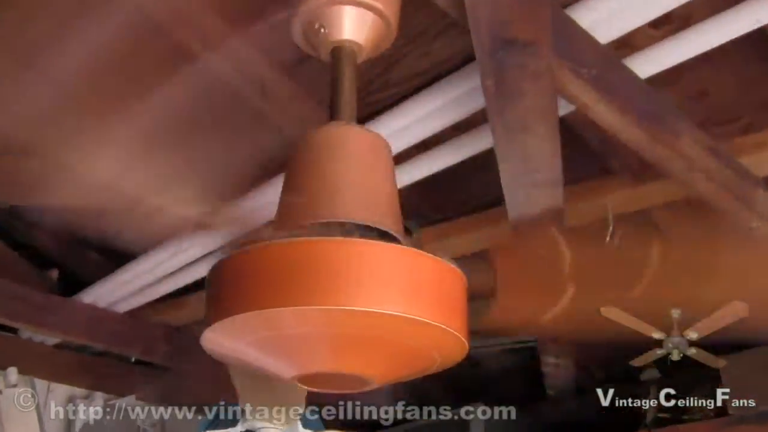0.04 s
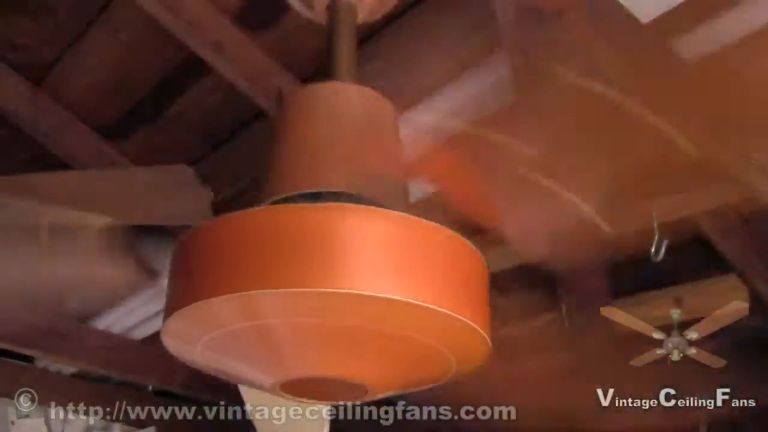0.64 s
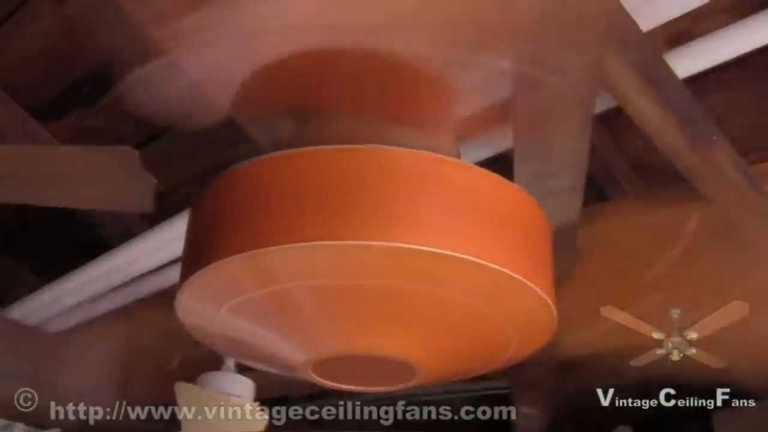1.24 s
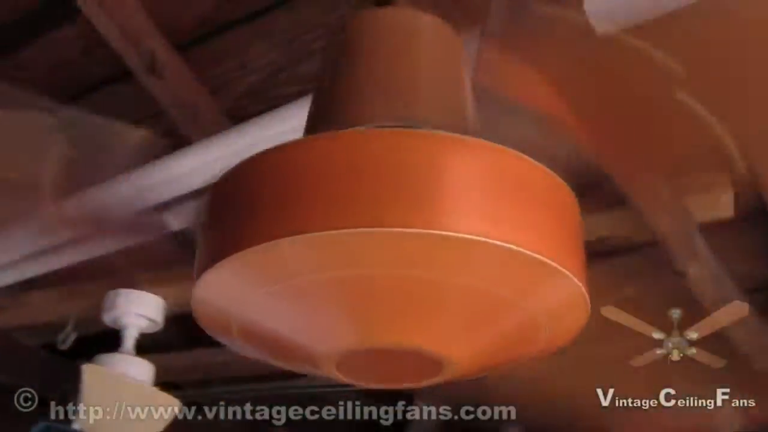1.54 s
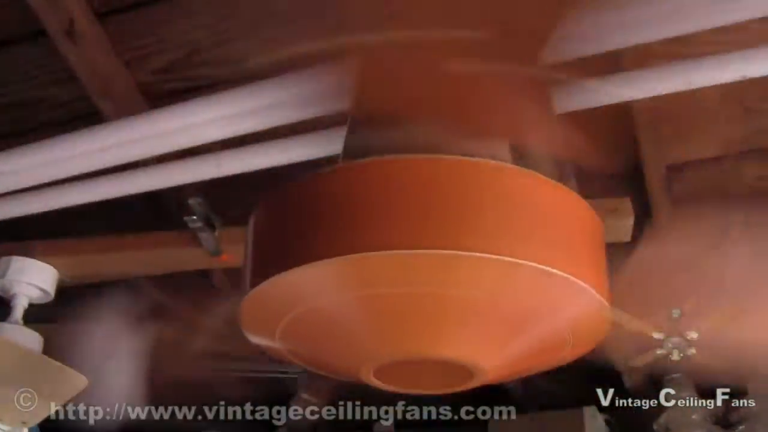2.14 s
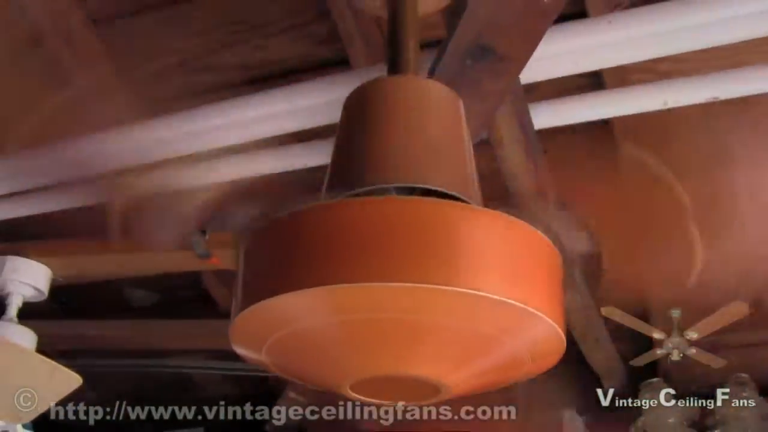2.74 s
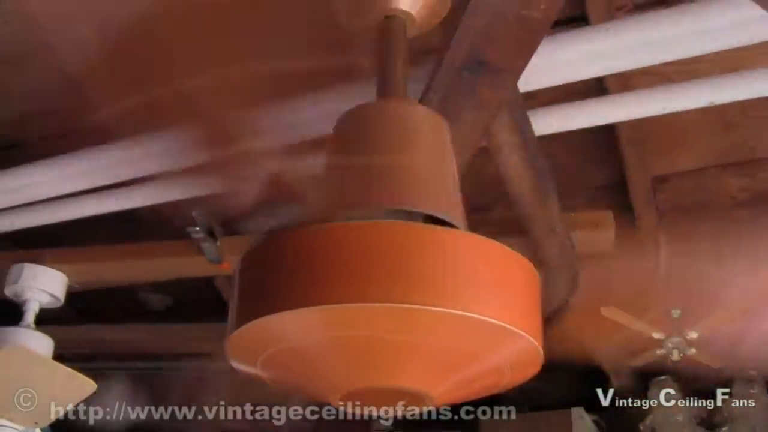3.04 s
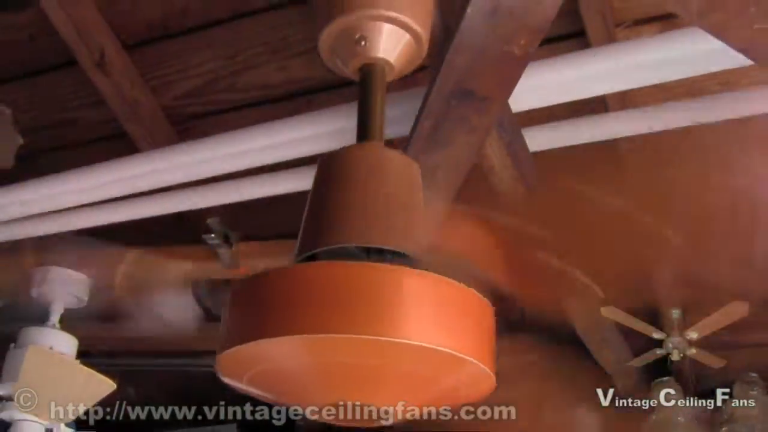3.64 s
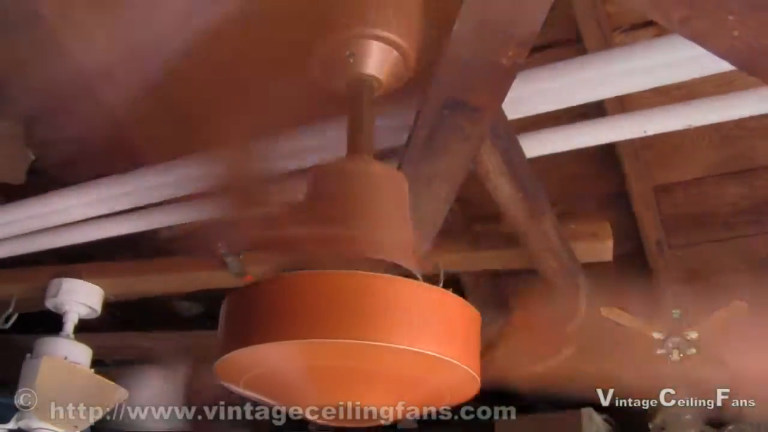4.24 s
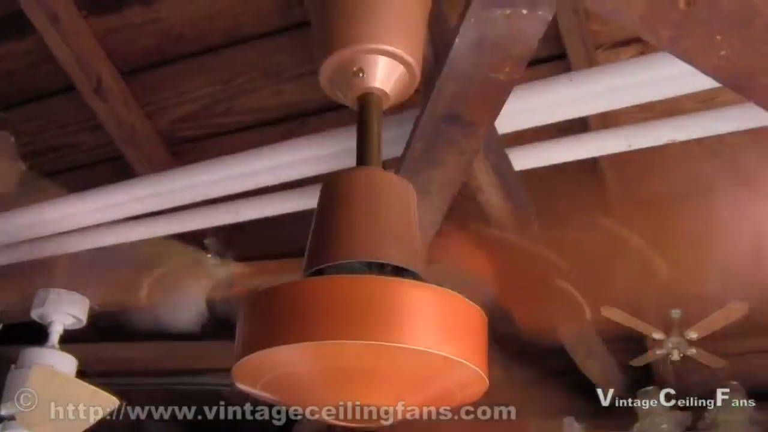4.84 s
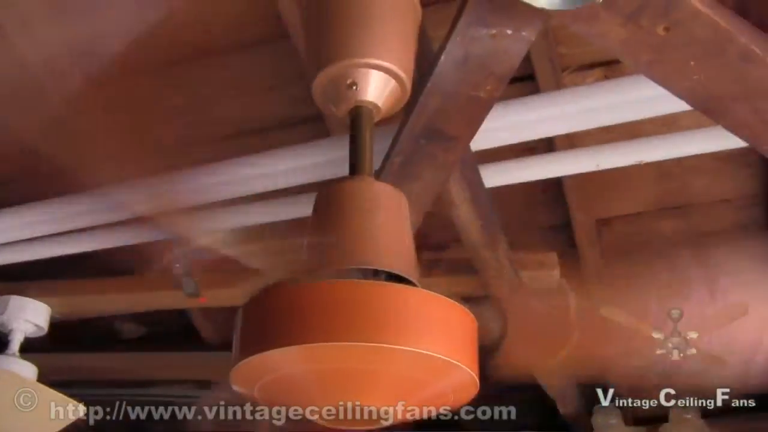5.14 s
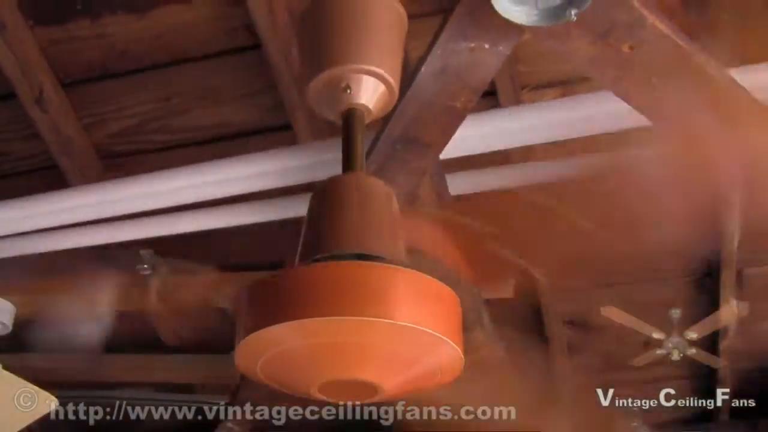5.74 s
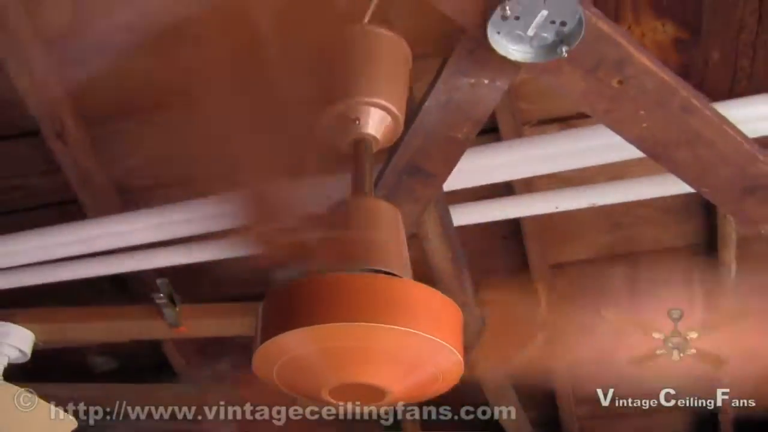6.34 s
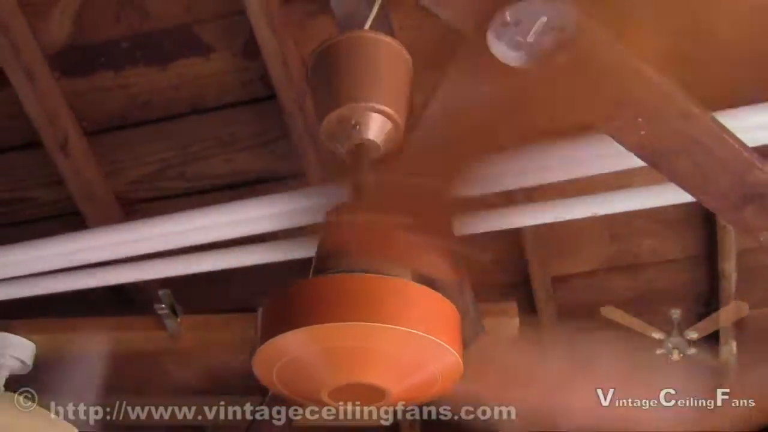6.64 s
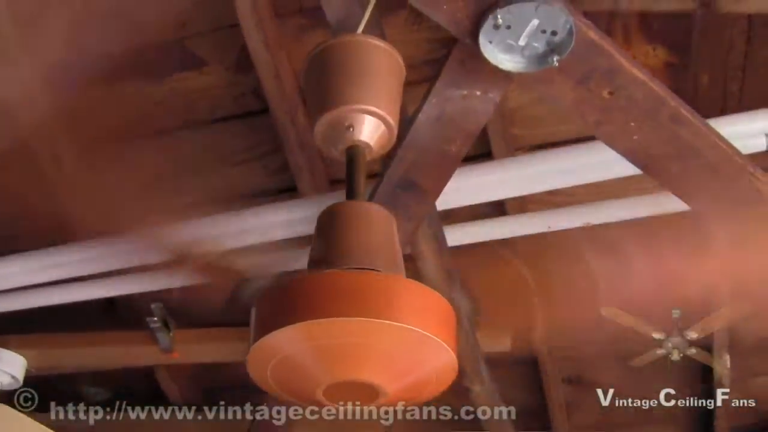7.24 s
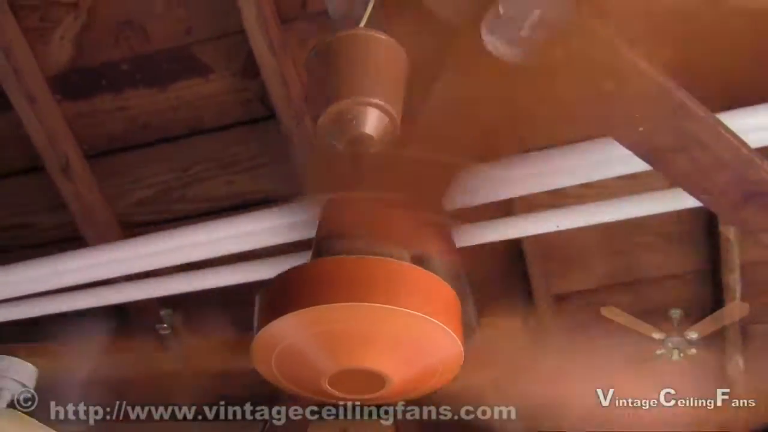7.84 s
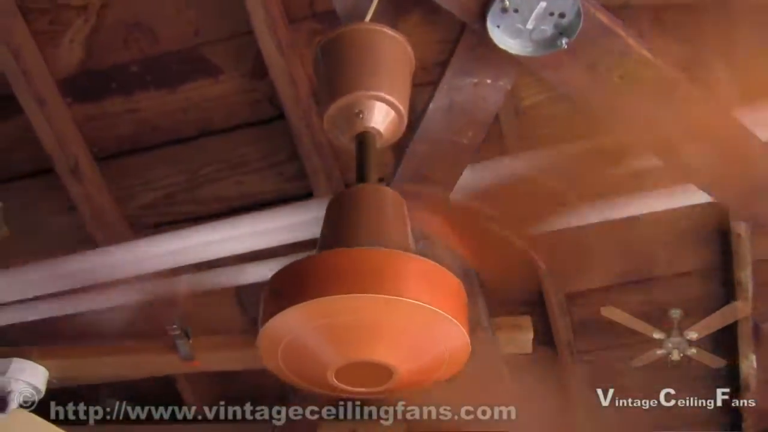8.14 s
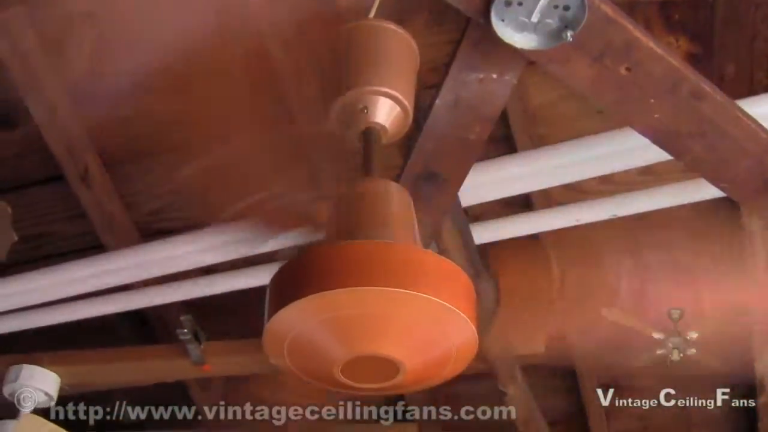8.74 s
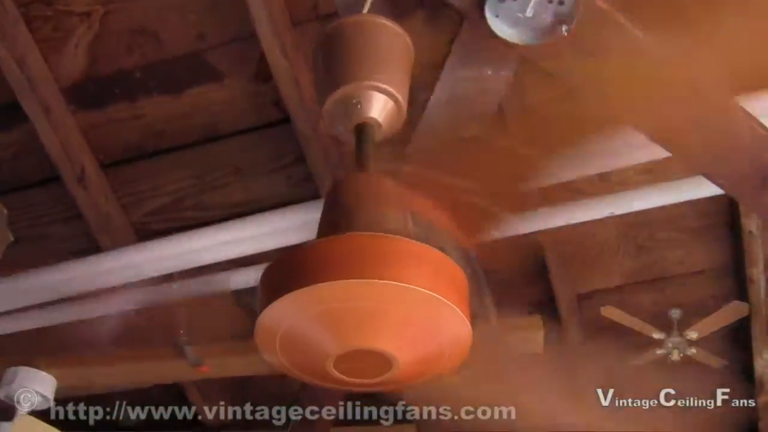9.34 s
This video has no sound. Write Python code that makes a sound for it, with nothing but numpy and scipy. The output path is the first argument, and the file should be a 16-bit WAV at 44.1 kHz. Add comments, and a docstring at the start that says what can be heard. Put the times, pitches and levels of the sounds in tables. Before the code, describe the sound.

A ceiling fan with metal blades spins fast indoors, close to a hand-held stereo microphone. Throughout, the blades swish about sixteen times a second over a steady rush of air, with a soft hollow tone and a faint motor hum. From about 0.3 seconds the downdraught strikes the microphone in loud, ragged, crackling puffs, with deep rumbles and dull thumps shifting between left and right. This buffeting drops away at about 3.6 seconds, returning in weaker gusts between 4 and 4.5 seconds. The quieter, pulsing rush then carries on, with a short snap of air at 4.75 seconds and a softer one near 5.7. One more brief gust thumps the microphone at 7.5 seconds. A few light snaps follow around 8 seconds as a faint, higher airy tone joins in, and the fan keeps swishing until the end at about 9.5 seconds.

```python
"""Under a fast ceiling fan

Metal blades spin under a timber roof, close to a hand-held stereo microphone. Each blade swishes over a
steady rush of air and a faint motor hum. For the first seconds the downdraught hits the two microphone
ports in ragged, crackling puffs, one a blade, then only in stray gusts. A limiter ducks the rush under
the strongest of them."""
import sys
import numpy as np
from scipy import signal
from scipy.fft import rfft, irfft, next_fast_len
from scipy.io import wavfile
from scipy.ndimage import uniform_filter1d, minimum_filter1d, map_coordinates

SR = 44100
rng = np.random.default_rng(int(sys.argv[2]) if len(sys.argv) > 2 else 0)


def unload_audio(sound):
    """Save the sound as a 16-bit wav file, at the path given as the first command line argument."""
    columns = np.transpose(np.atleast_2d(sound))
    # keep every value between -1 and 1, then stretch to whole-number steps
    steps = np.round(np.clip(columns, -1, 1) * 32767)
    wavfile.write(sys.argv[1], SR, steps.astype(np.int16))


N = 418508
TIME = np.arange(N) / SR
BLADE_HZ = 15.8  # blade passes a second


def amp(db):
    """Decibels to gain."""
    return 10 ** (np.asarray(db) / 20)


def unit(x):
    """Scales to rms 1."""
    return x / np.sqrt(np.mean(x ** 2) + 1e-20)


def curve(rows, column=1):
    """One column of a time table at every sample."""
    rows = np.asarray(rows)
    return np.interp(TIME, rows[:, 0], rows[:, column])


def colour(x, *spectra):
    """Filters x by the product of spectra given as f/Hz, level/dB."""
    size = next_fast_len(N)
    log_hz = np.log(np.fft.rfftfreq(size, 1 / SR) + 1)
    db = sum(np.interp(log_hz, np.log(rows[:, 0] + 1), rows[:, 1]) for rows in map(np.asarray, spectra))
    return irfft(rfft(x, size) * amp(db), size)[:N]


def noise(*spectra):
    """Fresh noise of the given colour."""
    return colour(rng.standard_normal(N), *spectra)


def even_noise(spectrum, even_s=0.0087):
    """Coloured noise whose strength holds from one instant to the next."""
    x = noise(spectrum)
    power = uniform_filter1d(x ** 2, size=int(even_s * SR))
    return x / np.sqrt(abs(power) + 1e-20)


def wander(rate):
    """Smooth random drift of rms 1 that takes a new value rate times a second."""
    return unit(map_coordinates(rng.standard_normal(4096), [TIME * rate], order=2, mode="wrap"))


def split(x, hz):
    """The parts of x below and above hz."""
    low = signal.sosfiltfilt(signal.butter(2, hz, fs=SR, output="sos"), x)
    return low, x - low


# How late the blades come by as the microphone moves around the fan: t/s, lag/passes
BLADE_LAG = [(0.0, 0.33), (0.3, 0.42), (0.6, 0.29), (1.2, 0.71), (1.8, 1.07), (2.2, 0.85), (2.85, 0.96),
             (3.1, 0.83), (3.5, 0.83), (4.5, 0.88), (6.0, 1.084), (8.2, 1.093), (9.45, 0.97)]
def blade_count():
    """Running count of blade passes at the microphone, a whole number at each crest."""
    return BLADE_HZ * TIME - curve(BLADE_LAG)


def blade_pass(lead=0., peakiness=0.):
    """Swings once a blade, lead passes early; peakiness sharpens the crest."""
    angle = 2 * np.pi * (blade_count() + lead)
    return np.cos(angle) + peakiness * np.cos(2 * angle)


# The motor overhead, faint behind the air: f/Hz, level/dB
MOTOR_TONES = [(125, -57.5), (172.3, -52)]
def motor_hum(waver_db=3.0):
    """The motor's tones hold their pitch and waver in level."""
    hum = np.zeros(N)
    for hz, db in MOTOR_TONES:
        level = np.sqrt(2) * amp(db + waver_db * wander(2.6))
        hum += level * np.sin(2 * np.pi * (hz * TIME + rng.random()))
    return hum


def tick(at_s=3.083, level_db=-52, band_hz=(4000, 7200), ring_s=0.006):
    """One faint, bright tick."""
    t = TIME - at_s
    band = signal.butter(3, band_hz, "band", fs=SR, output="sos")
    ring = unit(signal.sosfilt(band, rng.standard_normal(N)))
    return amp(level_db) * ring * (t > 0) * np.exp(-np.clip(t, 0, 1) / ring_s)


# Broad tone of the blades' vortices, from where the microphone is held: t/s, f/Hz, level/dB
LOW_WHOO = [(0, 561.8, -43), (3.6, 519.7, -42.5), (4.5, 544, -41.5), (4.8, 626, -38.5), (5.05, 561.8, -51),
            (7.1, 431, -48.5), (7.7, 437.7, -46), (8.2, 443.6, -55), (9.45, 443.7, -50)]
# A higher one, heard once the microphone has drawn back: t/s, f/Hz, level/dB
HIGH_WHOO = [(0, 1200, -68), (6.7, 1200, -63.5), (7.3, 1212, -55.5), (7.9, 1220, -48), (8.4, 1187, -50),
             (9.45, 1207, -52)]
def vortex_tone(path, width_hz, glide, depth_db, uneven_db=4.0):
    """Shed vortices make a hollow whoo that swells with each blade and falls in pitch as it goes by."""
    hz = curve(path) * (1 + glide * blade_pass(lead=0.28))
    phase = 2 * np.pi * np.cumsum(hz) / SR
    tone = unit(wander(width_hz) * np.cos(phase) + wander(width_hz) * np.sin(phase))
    swell_db = depth_db * blade_pass(peakiness=0.36) + uneven_db * wander(BLADE_HZ)
    return tone * amp(curve(path, column=2) + swell_db)


# Air noise of the blades in the room: f/Hz, level/dB
RUSH_SPECTRUM = [(20, -26.5), (42, -21.5), (70, -10), (125, -2.5), (210, -6), (350, -6.5), (720, -7),
                 (1400, -14.5), (2550, -16.5), (3100, -26), (5700, -40.5), (9300, -48.5), (12000, -59.5),
                 (15500, -71.5)]
# Its stereo width at the microphone: f/Hz, side minus mid/dB
RUSH_SIDE = [(60, -25), (110, -17.5), (200, -17), (380, -15), (700, -18.5), (1290, -22), (2380, -16),
             (4400, -12), (8120, -8), (15000, 2.5)]
# Rings of the blades, housing and roof space: f/Hz, width/Hz, level/dB
RESONANCES = [(177, 11, 5), (272, 58, 2), (334.6, 24, 7), (847, 22, 5.5), (1136, 18, 4), (1680, 210, -2.5)]
def air_rush(level_db=-34.0):
    """Mid and side of the steady air noise, coloured by the fan and the space under the roof."""
    hz = np.geomspace(20, 4000, 2000)
    rings_db = sum(db / (1 + (2 * (hz - centre) / width) ** 2) for centre, width, db in RESONANCES)
    rings = np.transpose([hz, rings_db])
    mid, side = noise(RUSH_SPECTRUM, rings), noise(RUSH_SPECTRUM, rings, RUSH_SIDE)
    return amp(level_db) * np.array([mid, side]) / np.std(mid)


# How strongly the blades' whoosh and hiss come through and pulse; the hiss sinks under the wind:
# t/s, wake level/dB, hiss level/dB, whoosh depth/dB, hiss depth/dB
SWISH_LEVELS = [(0, -0.5, 3, 2, 1.5), (0.33, 3.5, 2, 2.5, 2.5), (0.45, 0.5, -0.5, 4.5, 0),
                (1.15, -2.5, 1, 4, 2.5), (1.6, 6.5, 1, 2.5, -2), (2.3, -0.5, -2.5, -3, 0.5),
                (3.5, 4.5, -1.5, 3.5, 3), (3.65, 1.5, 3.5, 2.5, 2.5), (4.8, 3, 3, 3, 2),
                (4.95, 2.2, 3, 2, 2.5), (5.4, 1.6, 2.1, 1.5, 3), (7.2, -0.8, 0.5, 1.5, 1.2),
                (7.8, 0, 1, 3, 1.5), (8.6, 0.1, 1.5, 1, 1.5), (9.45, 0, 2, 2, 1)]
def blade_swish(thrum_depth=2.8, fizz_depth=0.67, flutter_db=1.39, uneven=0.16):
    """Mid and side: each wake thrums and whooshes, the edges hiss just before, under a steadier fizz."""
    wake, edges = split(air_rush(), hz=1550)
    thrum, whoosh = split(wake, hz=330)
    hiss, fizz = split(edges, hz=3800)
    # no two passes are quite alike, and the wake flutters most at the crest of each
    swing = blade_pass(lead=0.01, peakiness=0.19) * (1 + uneven * wander(BLADE_HZ))
    whoosh_db = curve(SWISH_LEVELS, column=3) * swing
    wake_db = curve(SWISH_LEVELS) + flutter_db * wander(220) * (1 + swing / 2)
    edge_swing = blade_pass(lead=0.02, peakiness=0.71) * (1 + uneven * wander(BLADE_HZ))
    hiss_db = curve(SWISH_LEVELS, column=4) * edge_swing
    wake = thrum * amp(thrum_depth * whoosh_db) + whoosh * amp(whoosh_db)
    edges = hiss * amp(hiss_db) + fizz * amp(fizz_depth * hiss_db)
    return wake * amp(wake_db) + edges * amp(curve(SWISH_LEVELS, column=2))


# The snaps that reach the microphone most clearly: t/s, level/dB
CLEAR_SNAPS = [(4.750, -11), (5.745, -19), (7.793, -16.5), (7.857, -21), (7.914, -22), (7.983, -16),
               (8.108, -14)]
def blade_snaps(level_db=-31, spread_db=2.0, scatter_s=0.004, spike_s=0.00027, suck_s=0.0011):
    """Each blade cuts the eddy shed by the one before: a pressure spike between two shallow dips."""
    crests = np.flatnonzero(np.diff(np.floor(blade_count())) > 0)
    late, size = rng.standard_normal((len(crests), 2)).T
    landings = np.clip(crests + (scatter_s * SR * late).astype(int), 0, N - 1)
    hits = np.zeros(N)
    hits[landings] = amp(level_db + curve(SWISH_LEVELS)[crests] + spread_db * np.clip(size, -2, 2))
    for at_s, db in CLEAR_SNAPS:
        hits[round(at_s * SR)] += amp(db)
    t = np.arange(-400, 401) / SR
    pulse = np.exp(-(t / spike_s) ** 2 / 2) - spike_s / suck_s * np.exp(-(t / suck_s) ** 2 / 2)
    return signal.oaconvolve(hits, pulse / pulse.max(), "same")


# The downdraught as the microphone moves into it and out again: t/s, level/dB
DOWNDRAUGHT = [(0.0, -50), (0.33, -28), (0.45, -18), (0.66, -17), (0.95, -14), (1.03, -21.5), (1.15, -15),
               (1.7, -17.5), (2.05, -14), (2.7, -19.5), (3.05, -13.5), (3.53, -15.5), (3.57, -29.5),
               (4.4, -51), (5.0, -54), (9.45, -84)]
# Gusts that reach the microphone from the edge of the draught: t/s, level/dB
STRAY_GUSTS = [(0.2, -24), (0.28, -23), (3.62, -33), (3.71, -28), (3.939, -34), (4.109, -20), (4.3, -20.5),
               (4.44, -23), (7.3, -47), (7.47, -32), (8.299, -36), (8.35, -39), (8.42, -38), (8.791, -40),
               (9.06, -46)]
def air_strength_db(rise_db_per_s=385, fall_db_per_s=194):
    """Air on the ports: the downdraught plus gusts that rise fast and fall more slowly."""
    gusts = [db - np.maximum(rise_db_per_s * (at_s - TIME), fall_db_per_s * (TIME - at_s))
             for at_s, db in STRAY_GUSTS]
    return 10 * np.log10(sum(amp(db) ** 2 for db in [curve(DOWNDRAUGHT), *gusts]))


# Slow air curling over both ports alike: f/Hz, level/dB
RUMBLE_SPECTRUM = [(15, -31.5), (30, -5), (55, -3), (100, 0.5), (155, -4.5), (230, -15), (450, -38),
                   (1500, -76), (6000, -125)]
def rumble(air_db, level_db=-26, knee_db=-36, growth=0.75, puff_db=1.3, lumpy_db=3.0):
    """Large slow eddies appear with the faintest draught and level off in strong air."""
    speed = amp(air_db - knee_db)
    level = amp(level_db + puff_db * blade_pass(lead=-0.033) + lumpy_db * wander(25))
    return level * (speed / (1 + speed)) ** growth * unit(noise(RUMBLE_SPECTRUM))


# Large eddies that press on both ports at once: t/s, level/dB, f/Hz
LARGE_EDDIES = [(0.397, -1, 80), (0.449, -3, 170), (0.592, 5.5, 125), (0.911, -10, 198), (1.105, -3, 253),
                (1.382, -5, 240), (1.572, -6, 184), (1.958, -1, 170), (2.012, -6, 180), (2.2, -12, 198),
                (2.455, -6.5, 189), (2.518, -8.5, 181), (2.739, -5.5, 170), (2.965, -7, 250),
                (3.542, -1.5, 32.2), (3.729, -10.5, 76), (3.787, -11, 65), (4.106, -8.5, 101),
                (4.362, -10, 83), (4.447, -11.5, 99.8), (7.454, -13, 149.6), (7.460, -6.5, 400),
                (7.482, -12, 121), (8.414, -24, 110)]
def thumps():
    """A large eddy sucks, pushes and sucks again: one dull, lopsided thump."""
    out = np.zeros(N)
    for at_s, db, hz in LARGE_EDDIES:
        near = abs(TIME - at_s) < .1
        u = np.sqrt(2) * np.pi * hz * (TIME[near] - at_s)
        out[near] += amp(db) * (1 - u ** 2 + u) * np.exp(-u ** 2 / 2)
    return out


# Crackle right at the edges of the ports: f/Hz, level/dB
CRACKLE_SPECTRUM = [(200, -15.5), (600, 2), (1100, 2.5), (2400, -11), (3200, -23), (6000, -42),
                    (12000, -84.5)]
def crackle(per_s=1400, side_db=-7.5):
    """Mid and side of the smallest eddies tearing at the ports in a spatter of tiny pressure pulses."""
    pulses = rng.choice([-1, 1], (2, N)) * (rng.random((2, N)) < per_s / SR)
    mid, side = (unit(colour(train, CRACKLE_SPECTRUM)) for train in pulses)
    return np.array([mid, amp(side_db) * side])


# Turbulence that both ports share: f/Hz, level/dB
SHARED_BUFFET = [(15, -31), (30, -26), (55, -10), (95, -2), (155, 3), (320, -5.5), (520, -12.5),
                 (1200, -24), (1650, -45), (3000, -60.5), (6000, -84.5), (12000, -100)]
# The wide, side part of the wind buffeting: f/Hz, level/dB
WIDE_BUFFET = [(20, -40.5), (48, -26.5), (112, 0.5), (190, 7), (240, 4), (342, 3), (550, -4), (1000, -12.5),
               (1400, -21.5), (3000, -48), (6000, -81.5), (12000, -100)]
def turbulence(force_db, mid_db=-2.5, full_db=-15, brightening=0.99, flicker_db=2.5):
    """Mid and side of air breaking on the ports; faster air sheds smaller, brighter eddies."""
    buffet = np.array([amp(mid_db) * unit(noise(SHARED_BUFFET)), unit(noise(WIDE_BUFFET))])
    low, high = split(buffet, hz=500)
    bright_db = np.minimum(brightening * (force_db - full_db), 0) + flicker_db * wander(260)
    return (low + high * amp(bright_db)) * amp(force_db)


def small_eddy_gain(level_db=-9.0, slap_s=0.0051, scatter_s=0.0049, spread_db=2.0):
    """Even a gentle puff carries a small eddy that breaks in a few milliseconds, near the crest."""
    passes = blade_count()
    nearest = np.round(passes).astype(int)
    early, weakness = rng.standard_normal((nearest.max() + 2, 2))[nearest].T
    t = (passes - nearest) / BLADE_HZ + scatter_s * early
    return amp(level_db - spread_db * np.clip(weakness, -2, 1)) * np.exp(-(t / slap_s) ** 2 / 2)


def blade_puffs(air_db, level_db=-1.5, puff_db=2.0, lumpy_db=1.5, gusty_db=1.5, crackle_db=-22):
    """Mid and side: each blade throws a ragged, crackling puff at the ports, some harder than others."""
    beat_db = puff_db * blade_pass(lead=-0.0098, peakiness=0.088)
    puffs = amp(level_db + beat_db + lumpy_db * wander(80) + gusty_db * wander(14))
    force_db = air_db + 20 * np.log10(np.hypot(puffs, small_eddy_gain()))
    return turbulence(force_db) + amp(force_db + crackle_db) * crackle()


# The low churn of a hard puff on the ports: f/Hz, level/dB
CHURN_SPECTRUM = [(30, -27), (60, -15.5), (110, -8), (170, -2.5), (270, -3.5), (350, -13), (700, -49),
                  (2000, -100)]
# Its hollow slap: f/Hz, level/dB
SLAP_SPECTRUM = [(150, -24.5), (260, -1.5), (350, 3), (550, -8.5), (1000, -16), (1400, -23), (2000, -43),
                 (6000, -89)]
# The strongest puffs, straight onto the microphone:
# t/s, half-length/s, churn level/dB, slap level/dB, crackle level/dB, left minus right/dB
HARD_PUFFS = [(0.226, 0.004, -21.5, -29, -29.5, -1), (0.268, 0.0082, -28, -19, -41, 0),
              (0.345, 0.0061, -31, -34, -26, -1), (0.45, 0.005, -9.5, -16, -48, 8.5),
              (0.472, 0.0058, -17, -10, -28.5, 8), (0.527, 0.0095, -14, -15, -26.5, 4),
              (0.585, 0.004, -7.5, -9.5, -27, -6), (0.641, 0.0059, -14.5, -16.5, -45, 1),
              (0.718, 0.0088, -9.5, -14.5, -28.5, 1), (0.779, 0.0062, -7, -10, -35, -1.5),
              (0.854, 0.0055, -16.5, -12.5, -35.5, -4), (0.906, 0.0057, -9.5, -9, -29, 1),
              (0.934, 0.007, -10, -13, -32.5, 1.5), (0.96, 0.007, -12, -17, -29, 2.5),
              (0.981, 0.0031, -7.5, -13, -23.5, 0), (1.043, 0.013, -29, -22, -31, 3),
              (1.107, 0.011, -13, -8.5, -22.5, 4), (1.187, 0.006, -18, -8, -26, -1.5),
              (1.239, 0.011, -11, -12, -40, -0.5), (1.304, 0.0053, -9, -6.5, -35, 0.5),
              (1.379, 0.0062, -14, -10, -32.5, 0.5), (1.439, 0.0042, -18, -8.5, -29, 3.5),
              (1.509, 0.0077, -13.5, -11, -26.5, 2.5), (1.579, 0.0071, -7, -16.5, -43.5, -7.5),
              (1.706, 0.0083, -10.5, -12, -45, -1), (1.774, 0.0071, -12, -18, -30.5, 0.5),
              (1.833, 0.011, -25, -12.5, -29, 3.5), (1.895, 0.0088, -17, -12, -36.5, 0.5),
              (1.959, 0.0068, -16.5, -12, -26, 7), (2.01, 0.0049, -15.5, -10.5, -36.5, 1.5),
              (2.154, 0.0064, -17, -17, -25.5, 4), (2.183, 0.0045, -17, -16, -47, -9),
              (2.237, 0.0067, -13.5, -15, -46, 4), (2.272, 0.0071, -16, -14, -39.5, 2.5),
              (2.341, 0.0087, -12.5, -11.5, -34.5, 2.5), (2.406, 0.0092, -10, -18, -31.5, 2.5),
              (2.519, 0.0036, -17, -11, -34, -5.5), (2.593, 0.0077, -17, -10, -27.5, 3),
              (2.666, 0.0049, -9.5, -9, -31, 6.5), (2.785, 0.0092, -12.5, -11.5, -30.5, 1),
              (2.846, 0.0053, -10.5, -11, -28.5, -5), (2.9, 0.006, -13, -9, -26.5, 3),
              (2.964, 0.011, -11.5, -7.5, -26.5, 1.5), (3.019, 0.0086, -17, -11.5, -31, 2.5),
              (3.08, 0.0057, -15, -7, -24, 4.5), (3.141, 0.0071, -17, -12, -29, -2),
              (3.202, 0.01, -16, -9, -35, -0.5), (3.274, 0.0093, -9, -8.5, -34, -1.5),
              (3.394, 0.0066, -5, -7.5, -25, -1), (3.481, 0.0057, -13.5, -17, -28.5, 1),
              (3.539, 0.0065, -7, -6, -28, 0), (3.972, 0.0052, -28, -29, -33, -2),
              (4.165, 0.0041, -21, -37, -47, -5), (4.235, 0.0039, -25, -40, -42, 0),
              (4.293, 0.0079, -12.5, -17, -45, -0.5), (4.365, 0.0041, -18.5, -16.5, -34, -4),
              (7.461, 0.0082, -13.5, -10.5, -37, -4)]
def hard_puffs(crackle_length=0.83, abruptness=2.23):
    """Left and right: a hard puff churns, slaps and crackles, mostly landing nearer one port."""
    churn = np.array([amp(-3.0) * even_noise(CHURN_SPECTRUM, even_s=0.007),  # mid
                      amp(-2.0) * even_noise(CHURN_SPECTRUM, even_s=0.0092)])  # side
    slap = np.array([amp(-8.0) * even_noise(SLAP_SPECTRUM), amp(-1.05) * even_noise(SLAP_SPECTRUM)])
    tearing, out = crackle(), np.zeros((2, N))
    for at_s, half_s, churn_db, slap_db, crackle_db, pan_db in HARD_PUFFS:
        near = abs(TIME - at_s) < .05
        offset = abs(TIME[near] - at_s) / half_s
        body = amp(churn_db) * churn[:, near] + amp(slap_db) * slap[:, near]
        body *= np.exp(-offset ** abruptness / 2)
        spatter = amp(crackle_db) * tearing[:, near]
        spatter *= np.exp(-(offset / crackle_length) ** abruptness / 2)
        out[:, near] += left_right(*(body + spatter), pan_db)
    return out


def left_right(mid, side, pan_db):
    """Mid and side to left and right; positive pan_db leans left."""
    lean = amp(pan_db / 2)
    return np.array([(mid + side) * lean, (mid - side) / lean])


# Where the fan sits between the ports as the microphone turns: t/s, left minus right/dB
FAN_BALANCE = [(0, 0.5), (.8, -1), (2.3, 1.4), (4.2, 0), (4.8, -0.5), (6.8, -0.5), (9.4, -0.3)]
def scene(self_noise_db=-77):
    """Fan, motor and wind in stereo, over the faint hiss of the microphone."""
    air_db = air_strength_db()
    mid, side = blade_swish() + blade_puffs(air_db)
    mid += vortex_tone(LOW_WHOO, width_hz=260, glide=0.098, depth_db=4.5)
    mid += vortex_tone(HIGH_WHOO, width_hz=300, glide=0.043, depth_db=2.5)
    mid += motor_hum() + rumble(air_db) + thumps() + tick() + blade_snaps()
    stereo = left_right(mid, side, curve(FAN_BALANCE)) + hard_puffs()
    return stereo + amp(self_noise_db) * rng.standard_normal((2, N))


def record(dry, knee_db=-21, squeeze=0.11, settle_s=1.0, ceiling_db=-2.5, recovery_db_per_s=95,
           low_cut_hz=38, high_cut_hz=15700):
    """Slow gain control, a peak limiter that recovers in a blade pass or two, then low and high cuts."""
    keep = np.exp(-1 / (settle_s * SR))
    power_db = 10 * np.log10(signal.lfilter([1 - keep], [1, -keep], (dry ** 2).mean(0)) + 1e-12)
    eased = dry / amp(squeeze * np.maximum(power_db - knee_db, 0))
    over_db = np.maximum(20 * np.log10(abs(eased).max(0) + 1e-9) - ceiling_db, 0)
    recovery_db = TIME * recovery_db_per_s
    held_db = np.maximum.accumulate(over_db + recovery_db) - recovery_db
    # the limiter looks a millisecond ahead, so its gain is down when the peak arrives
    ahead_db = -minimum_filter1d(-held_db, size=110)
    limited = eased / amp(uniform_filter1d(uniform_filter1d(ahead_db, size=70), size=40))
    # the deepest pushes are cut after they have ducked everything else
    limited = signal.sosfiltfilt(signal.butter(2, low_cut_hz, "high", fs=SR, output="sos"), limited)
    low_pass = signal.firwin(511, high_cut_hz, window=("kaiser", 9), fs=SR)
    return signal.oaconvolve(limited, low_pass[None], "same")


dry = scene()
out = record(dry)
unload_audio(out)
```